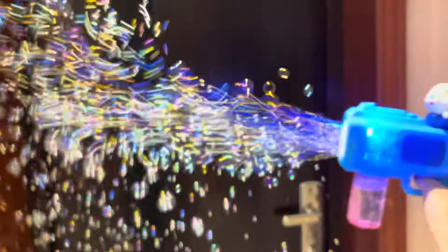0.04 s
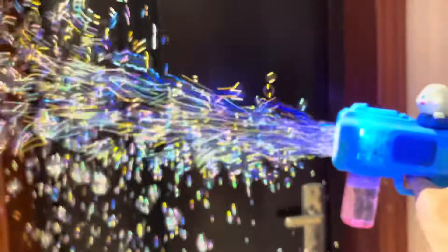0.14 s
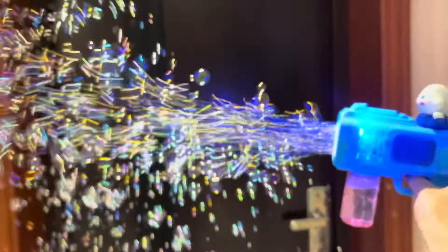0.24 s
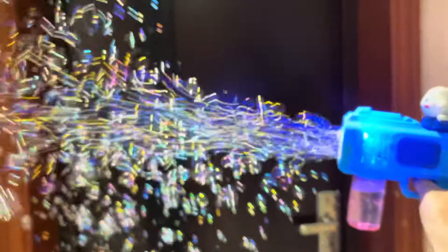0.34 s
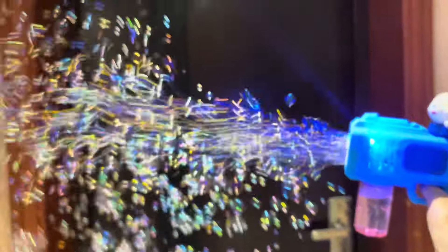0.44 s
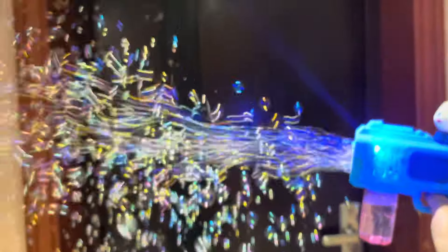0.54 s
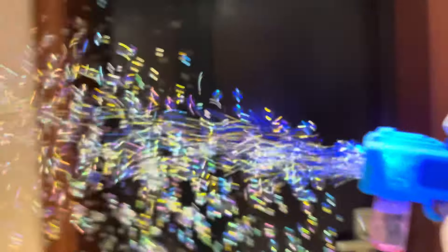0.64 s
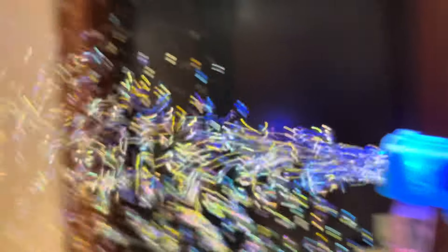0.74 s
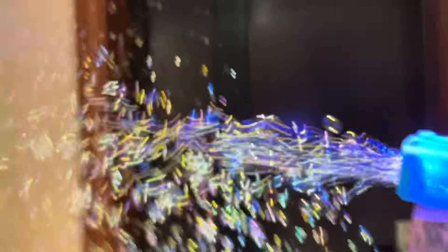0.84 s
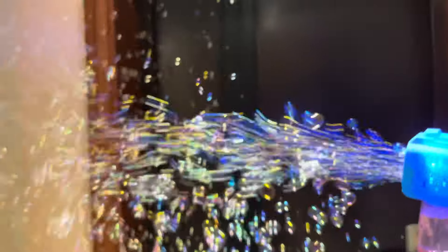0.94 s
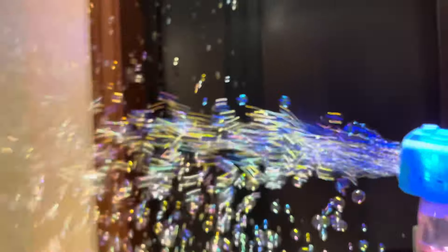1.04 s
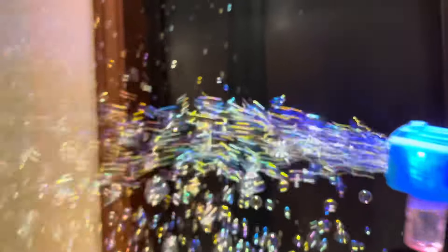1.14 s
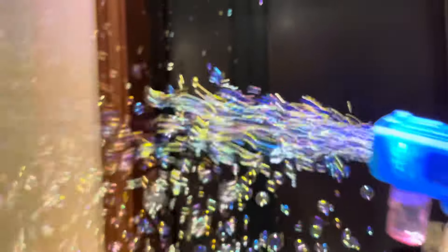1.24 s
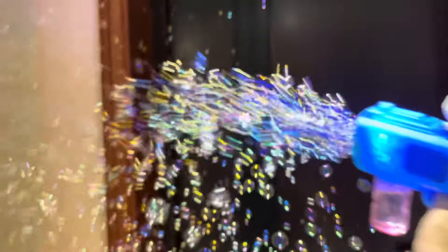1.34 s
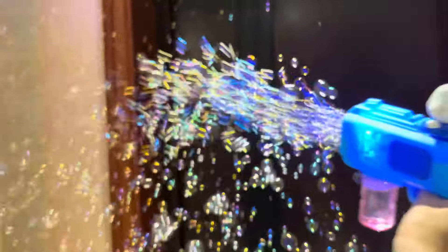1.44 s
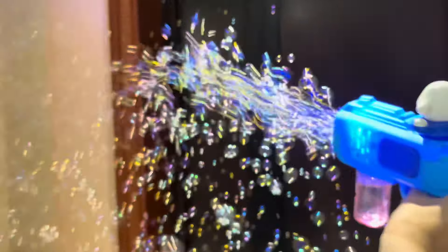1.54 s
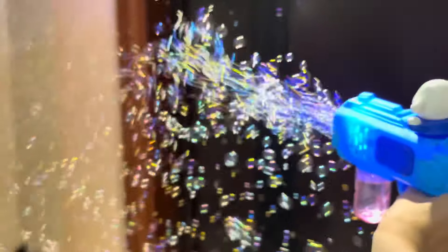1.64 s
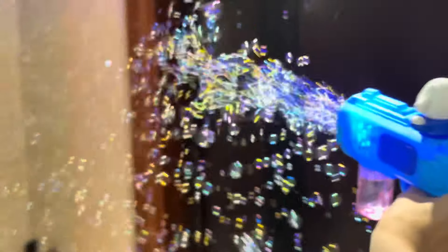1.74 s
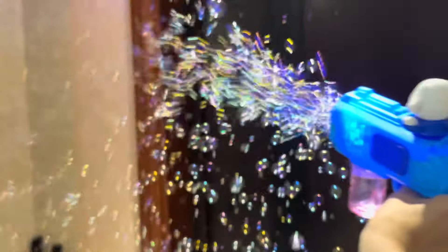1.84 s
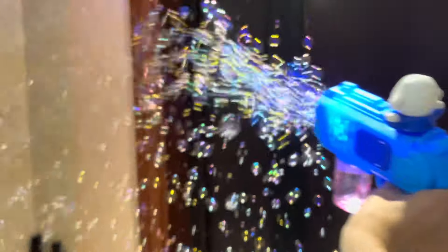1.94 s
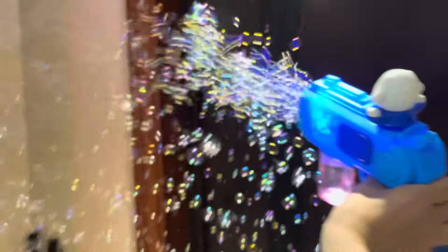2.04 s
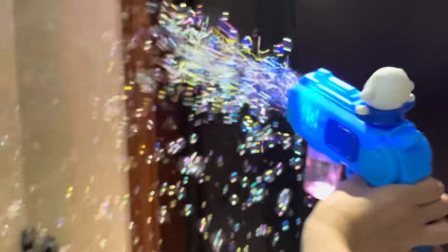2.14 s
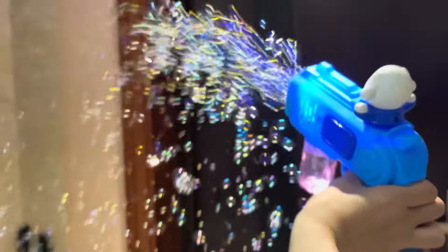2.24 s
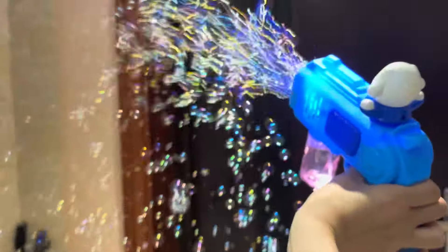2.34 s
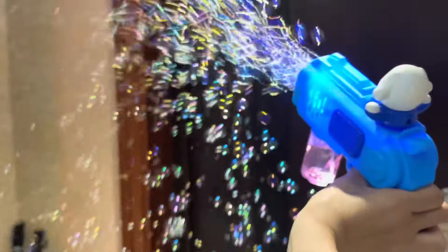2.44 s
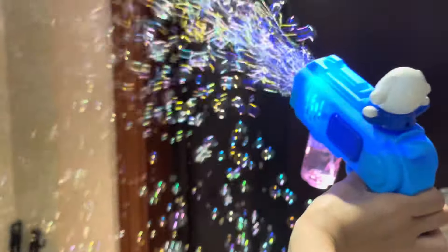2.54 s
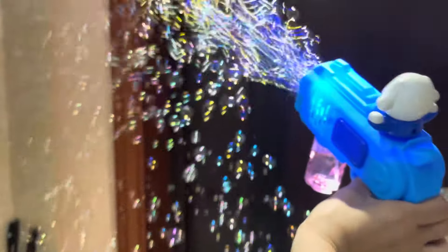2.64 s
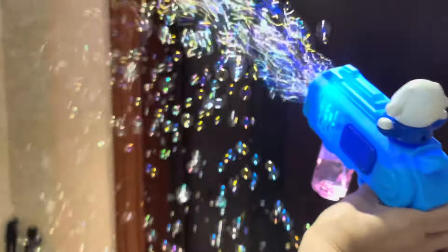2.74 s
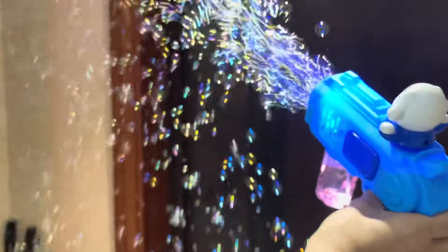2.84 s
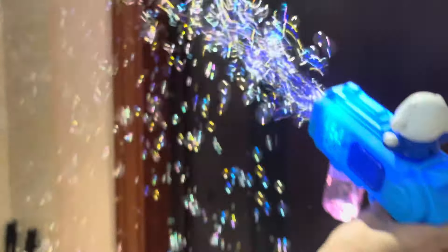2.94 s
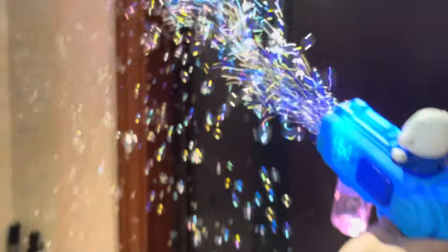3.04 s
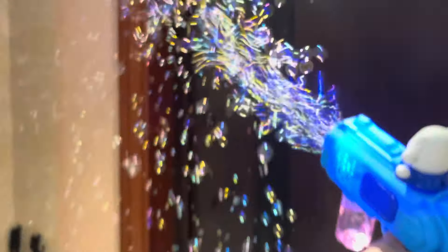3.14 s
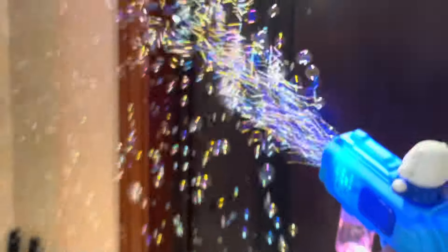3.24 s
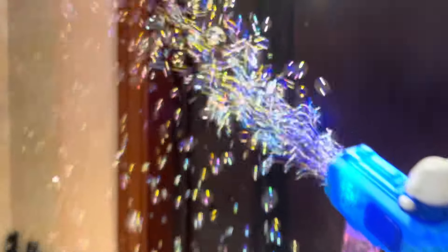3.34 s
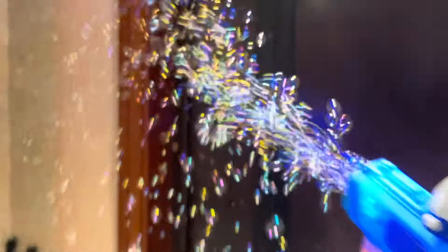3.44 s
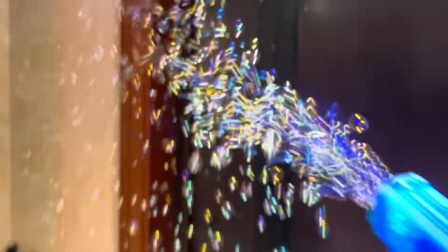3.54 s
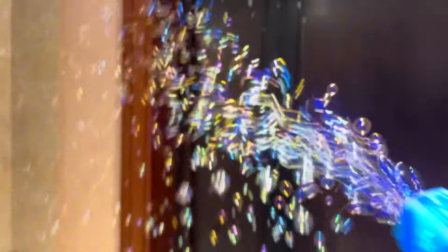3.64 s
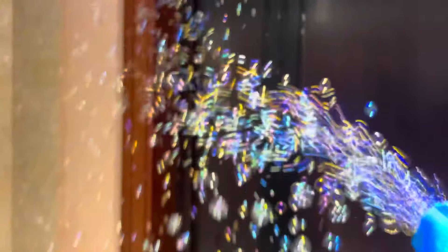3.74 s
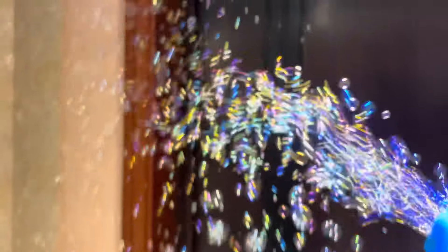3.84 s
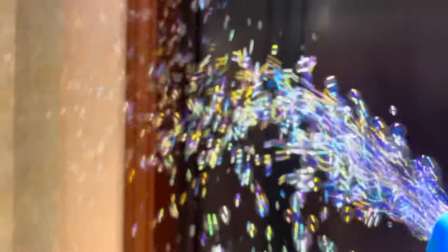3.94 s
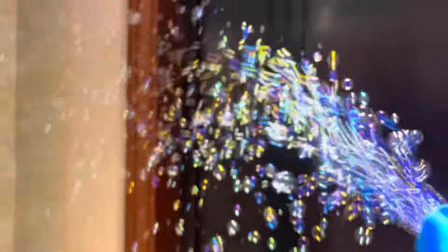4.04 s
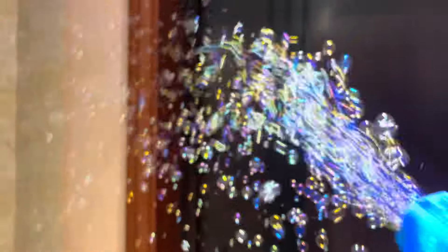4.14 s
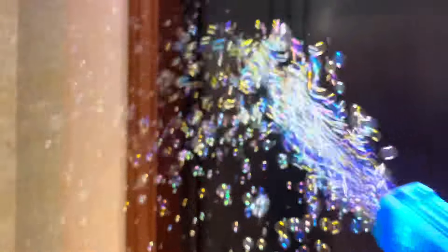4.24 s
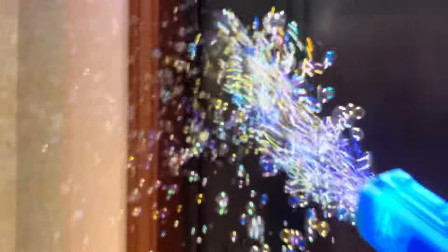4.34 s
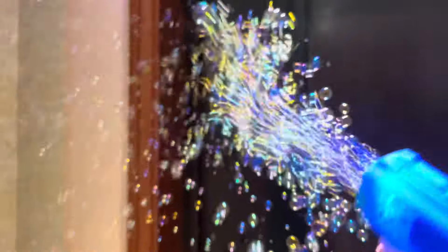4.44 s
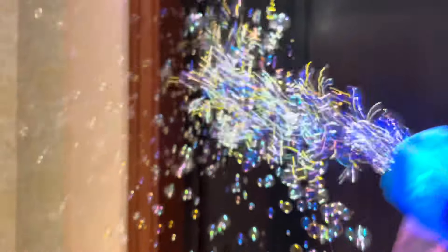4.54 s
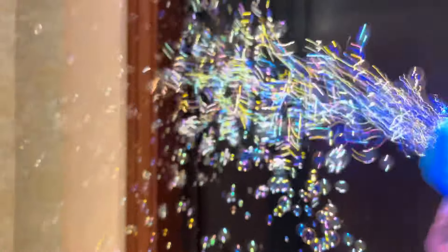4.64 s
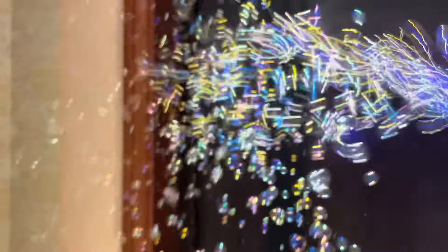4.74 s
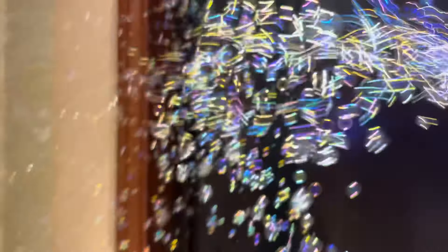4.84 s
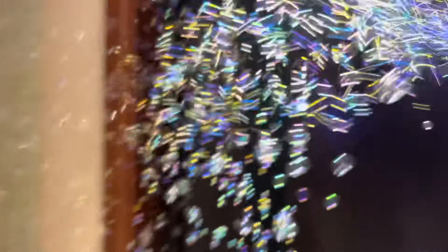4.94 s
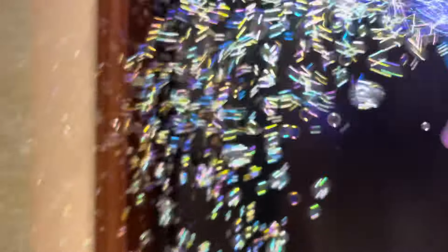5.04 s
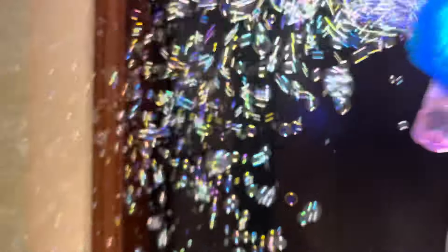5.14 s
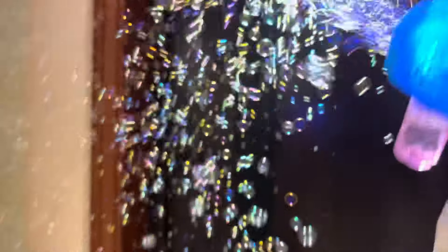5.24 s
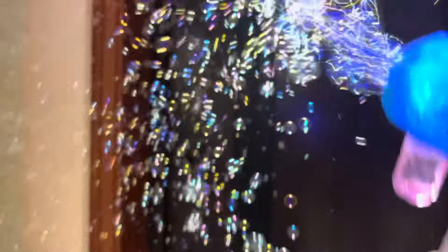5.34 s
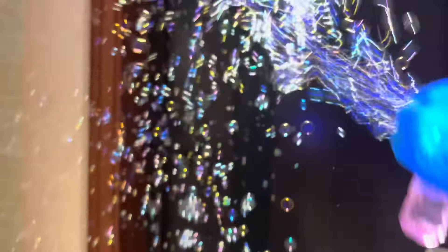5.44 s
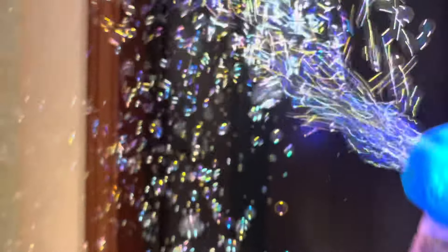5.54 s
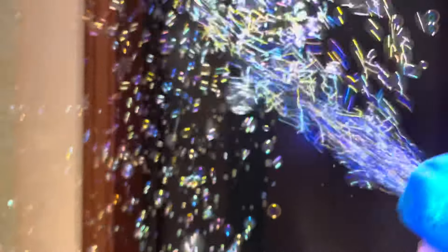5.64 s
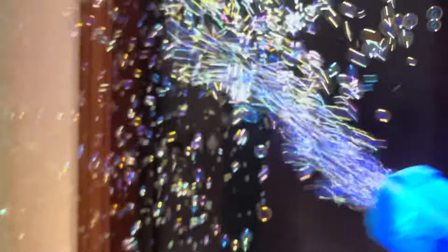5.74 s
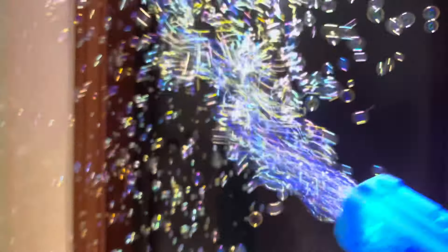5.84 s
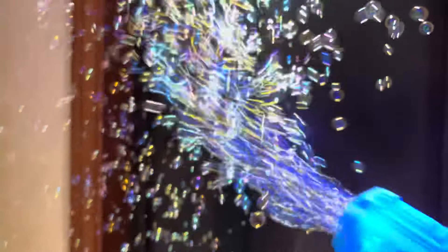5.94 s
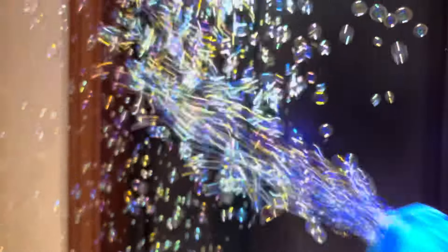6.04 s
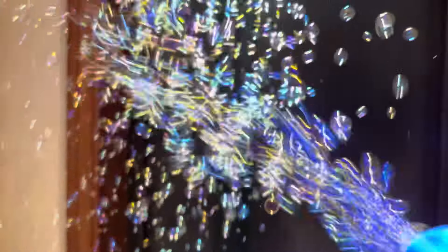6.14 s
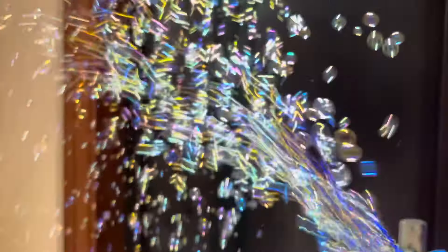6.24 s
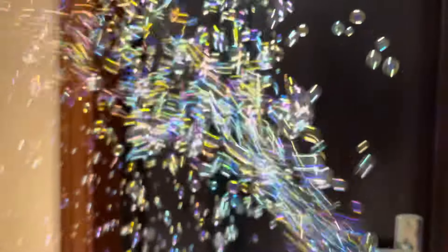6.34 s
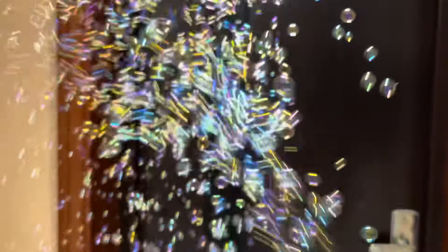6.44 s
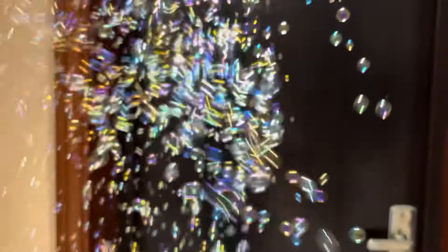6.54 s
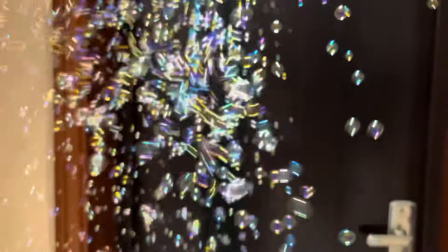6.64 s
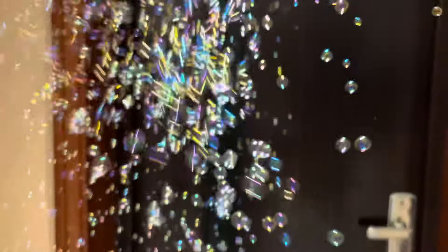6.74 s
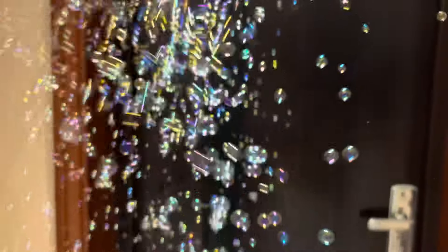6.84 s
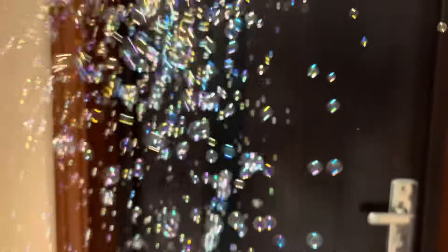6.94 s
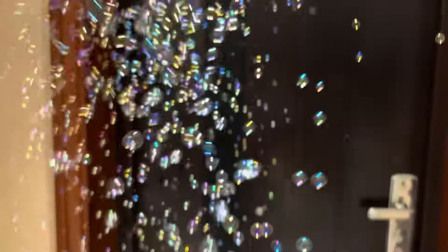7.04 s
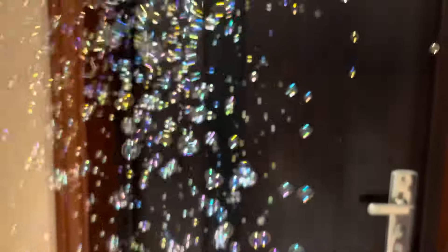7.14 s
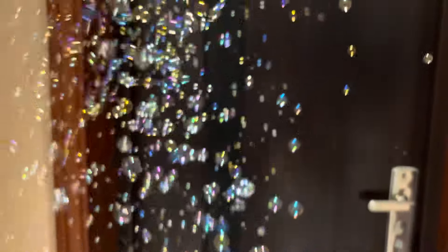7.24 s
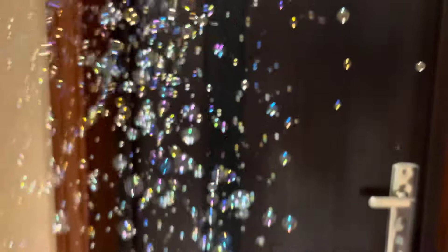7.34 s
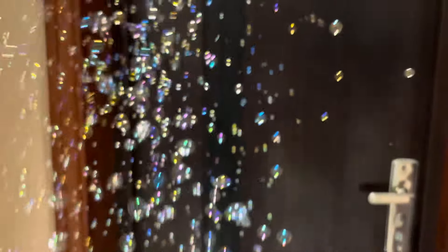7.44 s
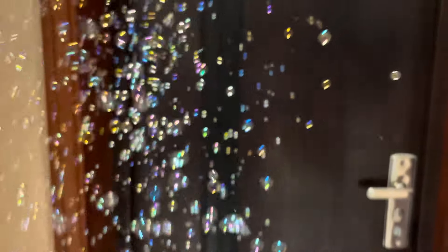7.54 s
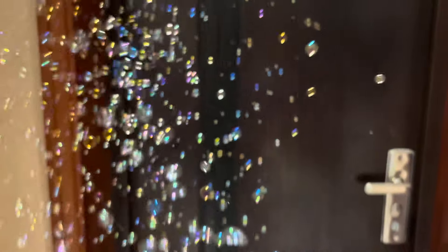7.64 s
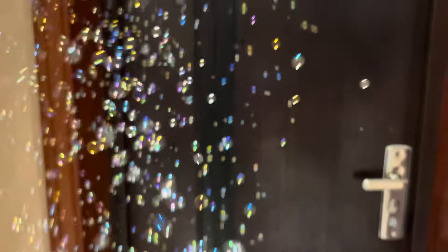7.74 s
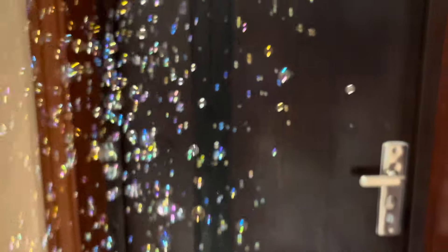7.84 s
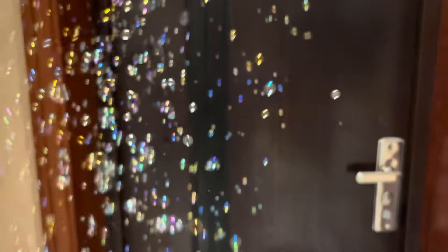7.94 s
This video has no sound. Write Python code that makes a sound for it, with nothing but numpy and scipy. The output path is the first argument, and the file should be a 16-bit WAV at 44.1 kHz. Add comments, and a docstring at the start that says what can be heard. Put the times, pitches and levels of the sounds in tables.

```python
"""A small room in a house, where a toy bubble gun is held close and swung about near a pair of microphones.
A fast little motor spins a seven-bladed fan: sines at multiples of its speed make the hum and blade whine.
Coloured noise makes the air rush and nozzle hiss; short noise bursts make the rattling plastic gears.
The trigger is let go and the fan coasts to a stop. Soap bubbles, fainter bursts, go on popping over the
house: a noise floor, a swelling drone and narrow hums."""
import sys
import numpy as np
from scipy import signal
from scipy.fft import rfft, irfft, next_fast_len
from scipy.io import wavfile
from scipy.ndimage import uniform_filter1d, map_coordinates

SR = 44100
rng = np.random.default_rng(int(sys.argv[2]) if len(sys.argv) > 2 else 0)


def to_wav(sig):
    """Store sig (one row per channel, or 1-D mono) as 16-bit WAV at the path in sys.argv[1].

    Samples outside -1..1 are clipped; the rate is SR.
    """
    pcm = np.clip(np.atleast_2d(sig), -1, 1) * 32767
    pcm = np.round(pcm).astype(np.int16)
    wavfile.write(sys.argv[1], SR, pcm.T)  # frames by channels


def ratio_of_db(decibels):
    """Turn decibels (scalar or array-like) into linear amplitude factors; 0 dB maps to 1."""
    return 10 ** (np.asarray(decibels, float) / 20)


N = 352800
T = np.arange(N) / SR  # time [s]


def unit(x):
    """Scaled to rms 1."""
    return x / np.sqrt(np.mean(x ** 2) + 1e-20)


def along(hz, points):
    """Columns of (frequency [Hz], ..) points, read on a log frequency axis."""
    f, *cols = np.transpose(points)
    return [np.interp(np.log(hz + 1), np.log(f + 1), c) for c in cols]


def curves(rows):
    """One value per sample for each column after the time."""
    s, *cols = np.transpose(rows)
    return [np.interp(T, s, c) for c in cols]


def bump(x, centre, width):
    """A bell of height 1, down to 1/e at width from its centre."""
    return np.exp(-((x - centre) / width) ** 2)


def bumps(rows):
    """The sum of (time [s], half length [s], height [dB]) bells."""
    return sum(db * bump(T, s, half) for s, half, db in rows)


def wobble(rate):
    """A smooth random curve, rate knots a second."""
    coarse = T[::64]
    knots = rng.standard_normal(1000)
    return np.interp(T, coarse, map_coordinates(knots, [coarse * rate], mode="wrap"))


def filtered(x, response):
    """x times a complex response of frequency."""
    m = next_fast_len(N + 8192)
    return irfft(rfft(x, m) * response(np.fft.rfftfreq(m, 1 / SR)), m)[..., :N]


def noise(spectrum, patchy_db):
    """Two unrelated noises of one colour that share time-frequency patches of random gain."""
    z = signal.stft(rng.standard_normal((2, N)), nperseg=512)[2]
    patches = uniform_filter1d(rng.standard_normal(z.shape[1:]), 6, 0)
    patches = uniform_filter1d(patches, 10, 1)
    pair = signal.istft(z * ratio_of_db(patchy_db * unit(patches)), nperseg=512)[1][:, :N]
    return unit(filtered(pair, lambda hz: ratio_of_db(along(hz, spectrum)[0])))


def clicks(times, start_db, colour, t60):
    """Decaying noise bursts of one colour, a separate draw for each of two sound fields."""
    t = np.arange(400) / SR
    grain = rng.standard_normal((len(times), 2, len(t)))
    bursts = ratio_of_db(start_db)[:, None, None] * ratio_of_db(-60 * t / t60) * grain
    at = (np.round(times * SR).astype(int)[:, None] + np.arange(len(t))).ravel()
    pair = [np.bincount(at, bursts[:, k].ravel(), N + len(t))[:N] for k in range(2)]
    return filtered(np.array(pair), lambda hz: ratio_of_db(along(hz, colour)[0]))


# trigger let go, time for speed to fall by 1/e, friction stops the fan, fade at the stall [s]
RELEASE_S, COAST_S, STALL_S, STALL_FADE_S = 6.233, 0.38, 6.67, 0.13
# the motor under power: (time [s], turns a second [Hz], out-of-balance hum level [dB],
# its second order level [dB], nozzle hiss level before sputter [dB])
SHAFT = [(0, 258.2, -28, -47, -21.5), (.7, 258.6, -28, -42, -23), (1.1, 256.7, -27, -51, -24),
         (1.4, 257.7, -25.5, -35, -23.5), (1.65, 256.7, -26, -38, -22.5), (2.15, 258.3, -24, -34.5, -24),
         (2.42, 261.6, -25, -36.5, -23.5), (2.75, 261, -27, -41, -23.5), (2.92, 258, -25.5, -33.5, -23.5),
         (3.35, 259.9, -25, -39, -24), (3.75, 261.6, -27, -38.5, -24), (4.4, 261.2, -25.5, -39, -23.5),
         (4.8, 257.8, -25, -42, -24), (5.25, 258.5, -22.5, -41, -22.5), (5.55, 261.8, -27.5, -39, -23.5),
         (5.75, 264.6, -25.5, -40, -23.5), (6.2, 264, -26, -38, -23)]


def motor():
    """Speed [Hz], falling exponentially once the trigger is let go, and its drop in decades."""
    drop = np.clip(T - RELEASE_S, 0, None) / COAST_S
    return curves(SHAFT)[0] * np.exp(-drop), drop / np.log(10)


# loss of each tone per tenfold drop in speed [dB]
HUM_LOSS_DB, WHINE_LOSS_DB, OCTAVE_LOSS_DB, WEAK_LOSS_DB = 75, 49, 160, 110
# the hum peaks as it slides through a resonance of the grip
SHUDDER_HZ, SHUDDER_WIDTH_HZ, SHUDDER_DB = 224.5, 19.5, 9
# blade whine as the gun swings: (time [s], level [dB], left over right [dB], left leads [rad])
BLADES = [(0, -28, 1.4, -1.5), (.08, -17.5, 2, -0.2), (.27, -21.5, 2, .2), (.62, -29, -8, .6),
          (.76, -21.5, 3.5, 3.5), (1, -26, 2, 3), (1.2, -18.7, 0, 2), (1.36, -20.5, -8, 2),
          (1.6, -15, 0.5, 2.5), (2.24, -20.8, -5, 2), (2.36, -19, -2, 1.85), (2.72, -21.5, -3.9, 0.9),
          (2.88, -19.5, 2.5, 1.8), (3.25, -18.5, 3, 2), (3.6, -19.5, -3, 1.3), (4.04, -18, 2.6, 1.37),
          (4.52, -24, 6, 2.5), (4.64, -23, 4, 2), (4.92, -16.5, .7, 1.75), (5.2, -28, 5, 1.5),
          (5.31, -17.5, 6, 1.6), (5.6, -13, 0, 1.4), (5.76, -18, -7.5, 3), (6.21, -19, 1.5, 3.5)]
# the whine drops out briefly: (time [s], half length [s], depth [dB])
DROPOUTS = [(.31, 0.028, 5), (2.28, 0.032, 11), (2.94, 0.027, 6), (3.03, 0.03, 10), (3.2, 0.056, 9),
            (3.35, 0.026, 9), (4.41, 0.025, 5), (4.5, .025, 7)]
# octave of the whine: (time [s], level [dB], left over right [dB])
OCTAVE = [(0, -25.5, -5), (.64, -22, -10), (.95, -21, -3), (1.28, -23.5, 1), (1.75, -24, -12.5),
          (2.2, -34, -8), (2.6, -34, -1), (2.88, -31.5, 4), (3.14, -32, -6), (3.22, -28.5, -9),
          (4.1, -30, -4), (4.7, -31.5, 2), (5.7, -25.5, -4), (5.92, -27, 5), (6.21, -22.5, -3)]
# the octave flares up: (time [s], half length [s], rise [dB])
FLARES = [(2.43, 0.062, 5), (2.97, 0.027, 10), (3.05, 0.031, 4), (3.36, 0.12, 8), (3.8, 0.15, 10),
          (4.27, 0.071, 6.5), (4.45, 0.15, 13.5), (4.78, .045, 11.5), (4.92, 0.041, 8), (5.14, .08, 8),
          (5.33, .04, 3.5), (5.56, .06, 7.5), (6.04, 0.064, 4.5)]
# weak shaft orders at full speed: (multiple of speed, level [dB])
ORDERS_WEAK = [(3, -43), (4, -42.5), (5, -41.5), (6, -37.5), (21, -40)]
# a weak order stands out for a moment: (multiple of speed, time [s], half length [s], rise [dB])
WEAK_SWELLS = [(3, 0.87, .13, 11), (21, 2.65, .17, 8)]


def fan_tones():
    """Shaft orders: the hum is clean, the blade whine flutters as turbulence meets the blades."""
    hz, drop = motor()
    _, hum_db, second_db, _ = curves(SHAFT)
    whine_db, whine_pan_db, lead = curves(BLADES)
    octave_db, octave_pan_db = curves(OCTAVE)
    turn = 2 * np.pi * np.cumsum(hz) / SR
    side = np.array([[.5], [-.5]])  # left, right

    def sine(order, rms_db, shift):
        return np.sqrt(2) * ratio_of_db(rms_db) * np.sin(order * turn + shift)

    def each(rate):  # the room treats the two microphones differently
        return np.array([wobble(rate), wobble(rate)])

    hum_db = hum_db - HUM_LOSS_DB * drop + SHUDDER_DB * bump(hz, SHUDDER_HZ, SHUDDER_WIDTH_HZ)
    hum_db = hum_db + np.array([[0], [-3.5]]) + 0.47 * wobble(22)  # weaker on the right
    hum = sine(1, hum_db, -.7 * side)

    coasting = T > RELEASE_S  # the falling tone smears in the room
    whine_db = whine_db - bumps(DROPOUTS) - WHINE_LOSS_DB * drop + whine_pan_db * side
    whine_db = whine_db + 0.67 * wobble(35) + (1.7 + 1.2 * coasting) * each(14)
    whine_shift = (lead - 1.55 * coasting) * side + (.3 + 1.2 * coasting) * wobble(45)
    whine = sine(7, whine_db, whine_shift)

    octave_db = octave_db + bumps(FLARES) - OCTAVE_LOSS_DB * drop + octave_pan_db * side
    octave_db = octave_db + 2.45 * wobble(40) + 1.0 * each(11)
    octave = sine(14, octave_db, -.8 * side + 0.87 * wobble(35))

    second_db = second_db - WEAK_LOSS_DB * drop + 2.4 * wobble(15)
    second = sine(2, second_db, -.6 * side + 0.98 * wobble(22))

    weak = 0
    for order, db in ORDERS_WEAK:
        swell_db = bumps([row[1:] for row in WEAK_SWELLS if row[0] == order])
        weak_db = db + swell_db - WEAK_LOSS_DB * drop + 3 * wobble(3.07)
        weak = weak + sine(order, weak_db, 0.046 * order * wobble(30))

    on = np.clip((STALL_S + STALL_FADE_S - T) / STALL_FADE_S, 0, 1)
    return on * (hum + whine + octave + second + weak)


RUSH_DB = -16.5  # under power
RUSH_LOSS_DB, HISS_LOSS_DB = 48.5, 69  # per tenfold drop in speed
SCRAPE_S, SCRAPE_WIDTH_S, SCRAPE_DB = 6.63, 0.039, 4.5  # a last dry scrape just before the stall
FOAM_S, FOAM_WIDTH_S, FOAM_DB = 6.59, 0.097, 10.5  # the nozzle splutters as the stream breaks up


def draught():
    """Levels [dB] of rush and hiss follow fan speed; the rush dies at the stall, foam fizzes on a little."""
    drop = motor()[1]
    after = np.clip((T - STALL_S) / STALL_FADE_S, 0, 9)  # in stall fades
    rush_db = RUSH_DB - RUSH_LOSS_DB * drop + SCRAPE_DB * bump(T, SCRAPE_S, SCRAPE_WIDTH_S) - 7 * after
    hiss_db = curves(SHAFT)[3] - HISS_LOSS_DB * drop + FOAM_DB * bump(T, FOAM_S, FOAM_WIDTH_S)
    return rush_db, np.maximum(hiss_db, -51 - 2.5 * after)


def sputter(s, size_db, t60):
    """Gain that jumps whenever a soap film tears off the nozzle, then settles."""
    jumps = np.bincount((s * SR).astype(int), ratio_of_db(size_db), N)
    return 1 + signal.lfilter([1], [1, -ratio_of_db(-60 / (t60 * SR))], jumps)


# the rush below this keeps more of its level as the fan slows (dB per tenfold drop)
DULL_HZ, DULL_GAIN_DB = 1108, 22
# colour of the rush, below: (frequency [Hz], relative level [dB per Hz])
RUSH = [(100, -120), (150, -16), (330, -10.5), (800, -3.5), (1100, -2.5), (1500, -3), (2200, 0), (2800, -1),
        (3400, -0.5), (4200, -3), (5500, -2), (6500, -6.5), (8000, -19), (9000, -120)]
# colour of the hiss, above: (frequency [Hz], relative level [dB per Hz])
HISS = [(4000, -120), (5500, -11), (7000, -0.5), (9500, 0), (11000, -0.5), (13000, -3.5), (14500, -5.5),
        (15300, -10), (15800, -11), (16000, -120)]
# air cavities of the plastic housing: (frequency [Hz], half width [Hz], level against direct rush [dB])
HOUSING = [(400, 24, -12.5), (797, 30, -16), (1170, 150, -12), (1450, 8.3, -27), (1613, 37, -3),
           (2216, 55, -6), (3430, 290, -16.5)]


def air():
    """Turbulence rings the housing; the nozzle hisses and sputters."""
    rush_db, hiss_db = draught()
    surge = wobble(9)

    def cavities(f):
        return 1 + sum(ratio_of_db(db) / (1 + ((f - hz) / width) ** 2) for hz, width, db in HOUSING)

    rush = unit(filtered(noise(RUSH, patchy_db=1.0), cavities))
    dull = filtered(rush, lambda f: 1 / (1 + (f / DULL_HZ) ** 4))
    dull_gain = ratio_of_db(DULL_GAIN_DB * motor()[1])
    rush = ratio_of_db(rush_db + 0.29 * surge) * (rush + (dull_gain - 1) * dull)
    s, size = rng.random((150, 2)).T
    tear = sputter(STALL_S * s, -16 + 12 * size, t60=0.075)
    hiss = ratio_of_db(hiss_db + 0.18 * surge) * tear * noise(HISS, patchy_db=1.1)
    return rush * tear ** 0.32 + ratio_of_db(1.4) * hiss  # tearing films stir the rush less


# last gear teeth as the fan coasts, levels at the start of each burst before colouring:
# (time [s], knock level [dB], sharp edge level [dB])
TEETH = [(6.4712, -31, -28), (6.5014, -27, -30), (6.5236, -11.5, -36), (6.5844, -27, -20),
         (6.5904, -27, -22), (6.6134, -21, -33), (6.6418, -15, -29)]
# colour of a tooth knock: (frequency [Hz], gain [dB])
TOOTH = [(500, -30), (2500, -11), (5000, 1), (6500, -1.5), (8000, -36)]
# colour of a sharp pop, for tooth edges and bubbles: (frequency [Hz], gain [dB])
POP = [(1500, -30), (5000, -10), (11000, 5), (15000, 0), (16000, -120)]


def gears():
    """Loose plastic teeth rattle at random under load and click singly as they slow."""
    s, size = rng.random((1200, 2)).T
    s = STALL_S * s
    rattle_db = draught()[0][(s * SR).astype(int)] - 4.2 + 9 * size ** 3  # mostly small knocks
    s_last, knock_db, edge_db = np.transpose(TEETH)
    times = np.r_[s, s_last]
    knocks = clicks(times, np.r_[rattle_db, knock_db], TOOTH, t60=0.023)
    edges = clicks(times, np.r_[rattle_db - 5, edge_db], POP, t60=0.011)
    return knocks + edges


# the clearest bubble pops: (time [s], level at the start of the burst before colouring [dB])
POPS = [(6.8618, -41), (6.8902, -38), (7.0628, -39), (7.1514, -39), (7.3342, -39), (7.447, -38),
        (7.4979, -43), (7.6281, -39), (7.6755, -38), (7.7238, -36)]


def bubbles():
    """Soap films burst all round, a few of them close."""
    s, size = rng.random((400, 2)).T
    s_near, near_db = np.transpose(POPS)
    far_db = -53 + 9 * size ** 3
    return clicks(np.r_[7.98 * s, s_near], np.r_[far_db, near_db], POP, t60=0.033)


HOUSE_DB, DRONE_DB = -40, -50  # between swells
# colour of the room tone: (frequency [Hz], relative level [dB per Hz])
HOUSE = [(12, -40), (25, -5), (55, -5), (100, -4), (200, -9.5), (400, -11), (800, -15), (1500, -15.5),
         (2500, -25), (4000, -31), (7500, -29.5), (12000, -30), (15300, -31), (16000, -120)]
# the low end swells: (time [s], half length [s], room tone rises [dB], drone rises [dB])
SWELLS = [(6.54, 0.26, 4.5, 14), (7.29, 0.16, 3.5, 0), (7.95, 0.14, 0.5, 4)]
# unsteady household hums: (frequency [Hz], width [Hz], level [dB])
HUMS = [(142.9, 3.4, -48), (231.6, 11, -52)]


def house():
    """Broad room tone with a swelling low drone and two narrow hums of filtered noise."""
    floor_db = HOUSE_DB + sum(db * bump(T, s, half) for s, half, db, _ in SWELLS)
    drone_db = DRONE_DB + sum(db * bump(T, s, half) for s, half, _, db in SWELLS)

    def band(hz, width):
        return unit(filtered(rng.standard_normal(N), lambda f: bump(f, hz, width)))

    drone = np.sqrt(2) * np.sin(2 * np.pi * 59 * T + 1.5 * wobble(7))
    drone = ratio_of_db(drone_db + 2.1 * wobble(6.4)) * drone
    low = drone + sum(ratio_of_db(db) * band(hz, width) for hz, width, db in HUMS)
    floor = ratio_of_db(floor_db + .8 * wobble(6)) * noise(HOUSE, patchy_db=2.0)
    return floor + np.array([low, 0 * low])  # the low tones lie in the shared field only


# the microphone pair: (frequency [Hz], likeness [0-1], left leads [rad], left over right [dB])
PORTS = [(30, .95, 1, -3), (90, 0.88, -0.5, 2.5), (250, 1, -0.76, 3), (500, 0.8, -0.76, -1.5),
         (905, 0.57, -0.9, -5), (1256, 0.1, -1.5, -3.5), (1740, 0.33, -4, 1), (2510, 0.74, -6.5, -0.5),
         (3560, 0.49, -6.5, -3.5), (4900, 0.64, -6.5, -2), (5324, 0.6, -8, -4), (5660, 0.6, -10, -2.5),
         (6400, 0.5, -10.5, -1), (6880, 0.63, -9, -5.5), (6960, 0.99, -9.5, -1), (7950, 1, -9.5, 0.5),
         (8450, 0.55, -9, 1), (9230, 0.5, -7.5, -1.5), (9940, 0.7, -6.5, 1), (10600, 1, -6.5, 0),
         (13800, 0.92, -6.5, 0), (14900, 0.7, -5, 0), (15700, .65, -5.5, 0)]


def ports(pair):
    """A shared and an unshared sound field reach the two microphones with the pair's lead and balance."""
    m = next_fast_len(N + 8192)
    alike, lead, balance_db = along(np.fft.rfftfreq(m, 1 / SR), PORTS)
    turn = np.arccos(np.clip(alike, 0, 1)) / 2
    shared, other = rfft(pair, m) * [np.cos(turn), np.sin(turn)]
    tilt = ratio_of_db(balance_db / 2) * np.exp(.5j * lead)  # half on each side
    return irfft([(shared + other) * tilt, (shared - other) / tilt], m)[:, :N]


def scene():
    """All sources at the two microphones."""
    return fan_tones() + ports(air() + gears() + bubbles() + house())


def low_pass(x):
    """Removes everything above the highest recorded frequency."""
    return signal.sosfilt(signal.butter(12, 16000, fs=SR, output="sos"), x)


def record(dry):
    """The phone rounds off the highest peaks, bending smoothly towards a ceiling of 0.88."""
    rounded = dry / (1 + np.abs(dry / .88) ** 8) ** (1 / 8)
    return low_pass(rounded)


dry = scene()
out = record(dry)
to_wav(out)
```